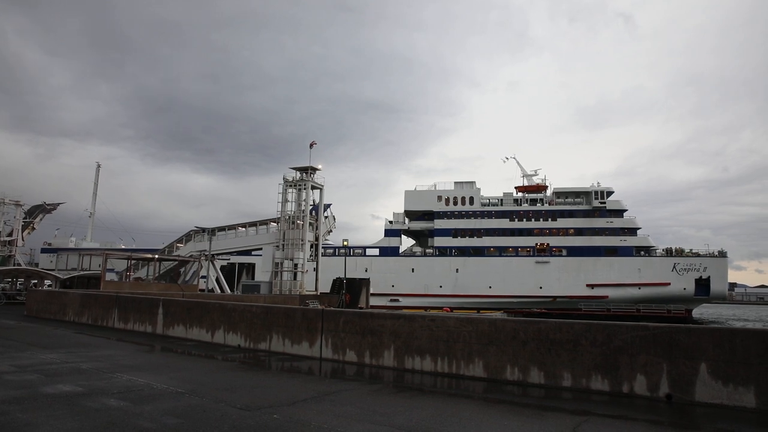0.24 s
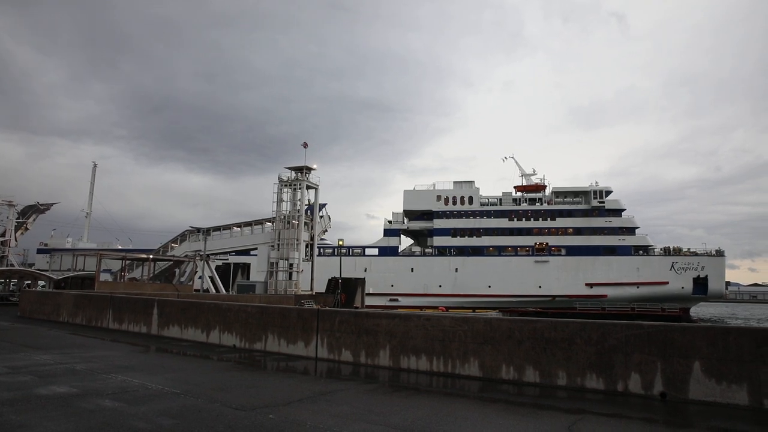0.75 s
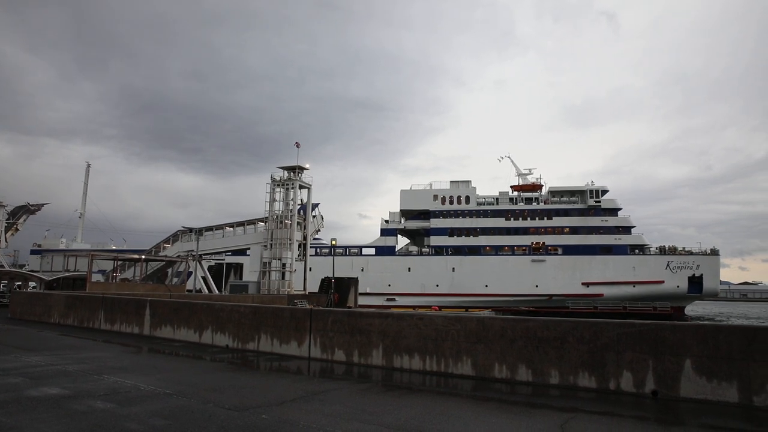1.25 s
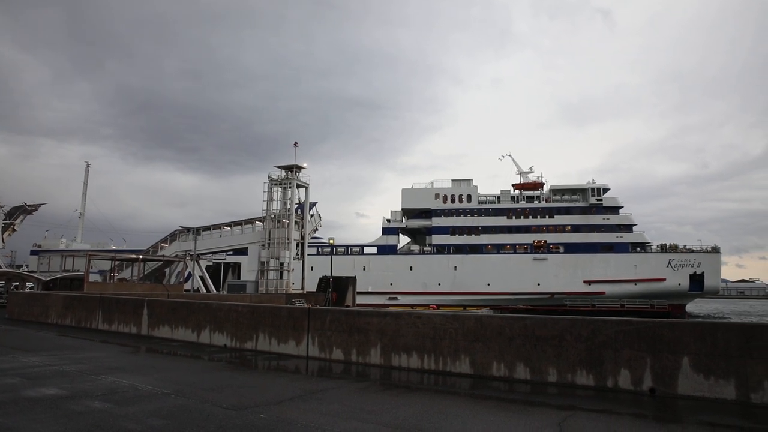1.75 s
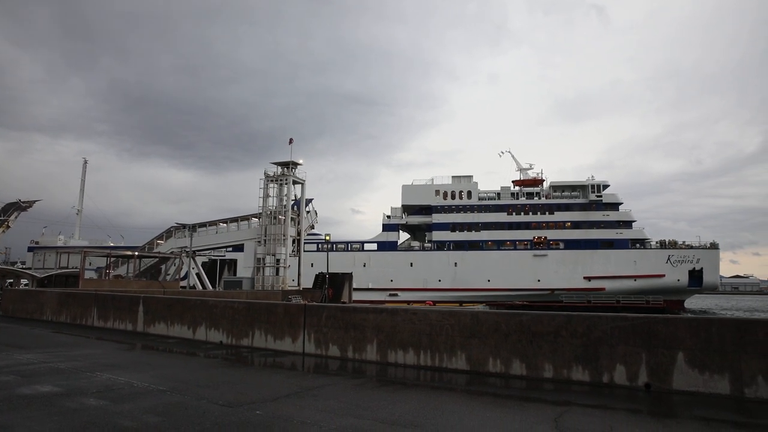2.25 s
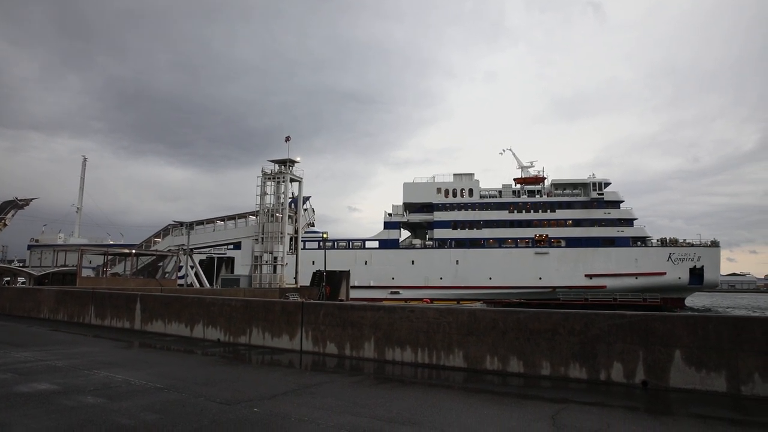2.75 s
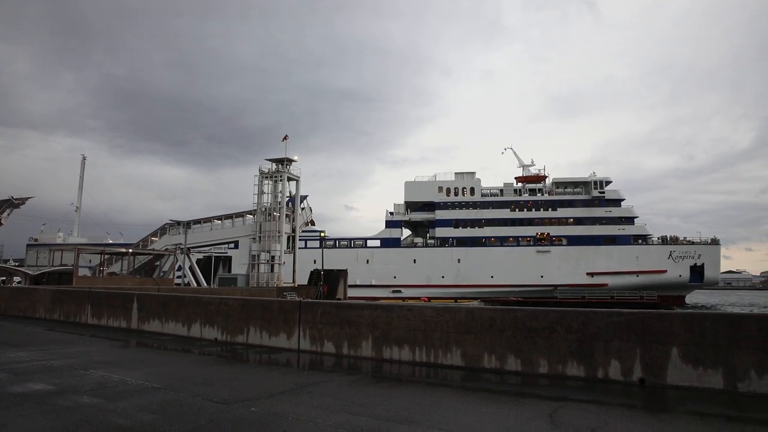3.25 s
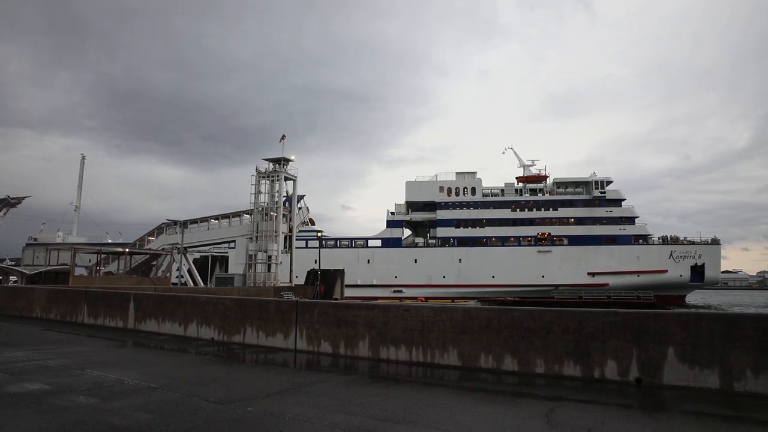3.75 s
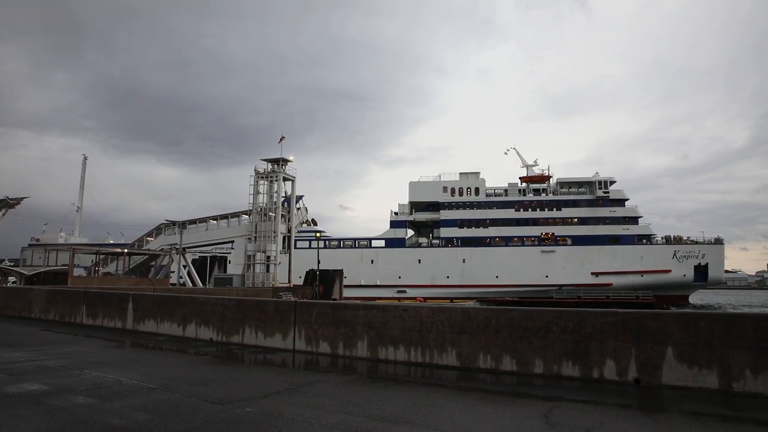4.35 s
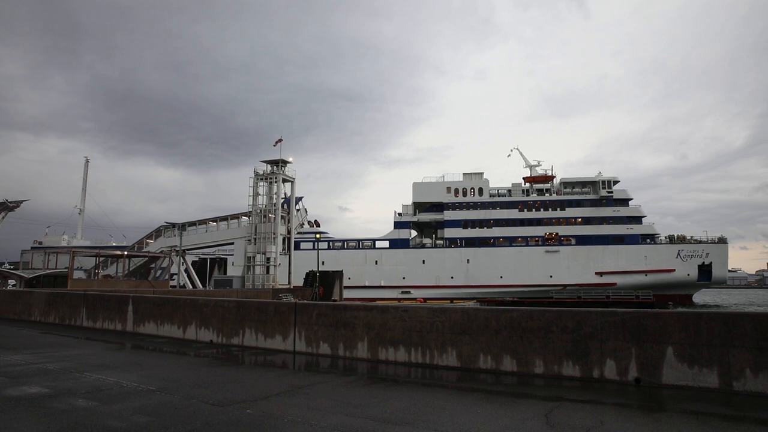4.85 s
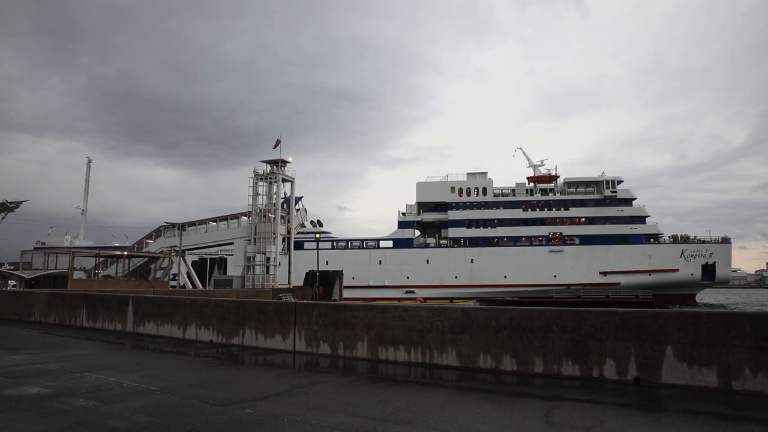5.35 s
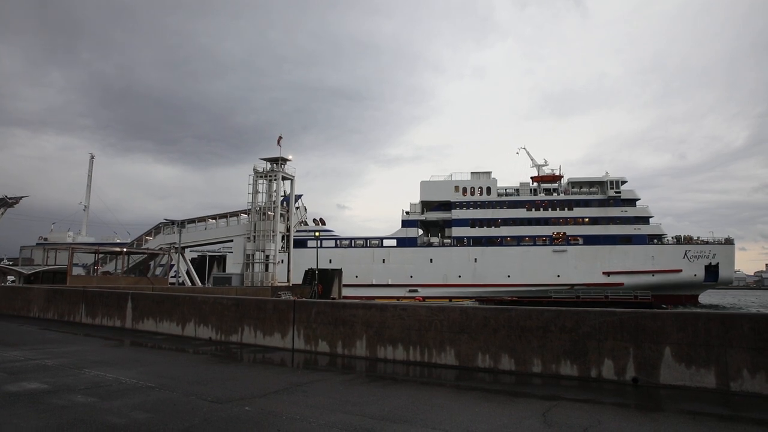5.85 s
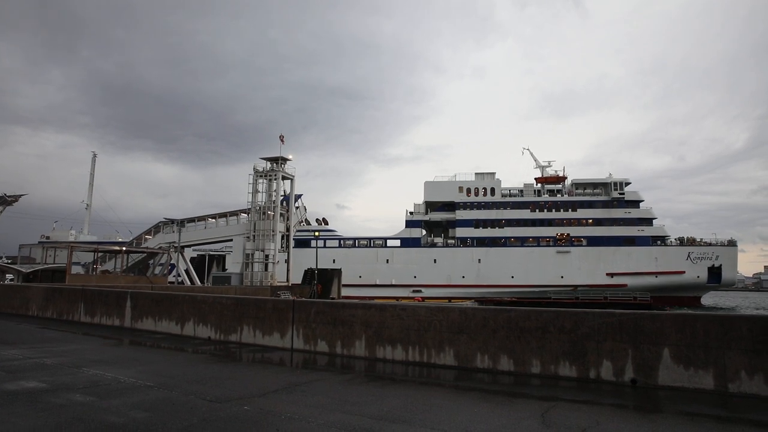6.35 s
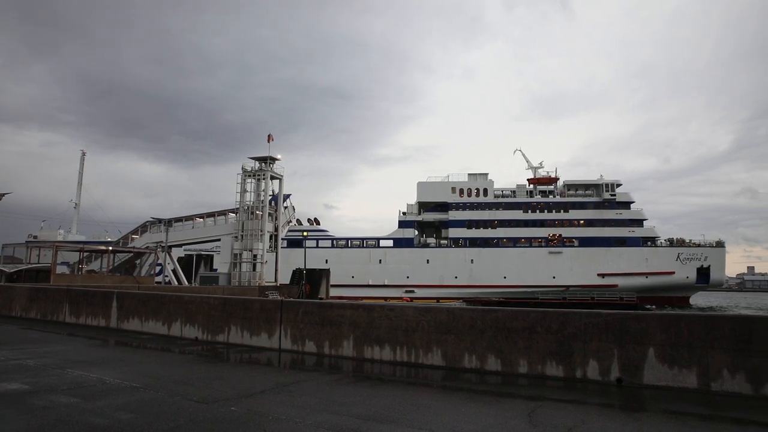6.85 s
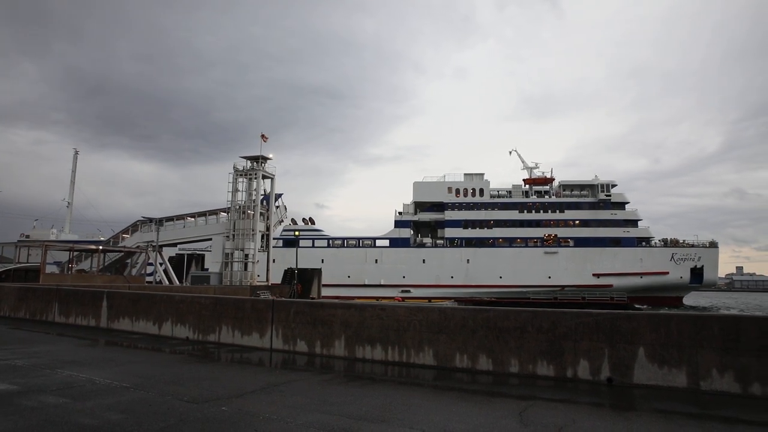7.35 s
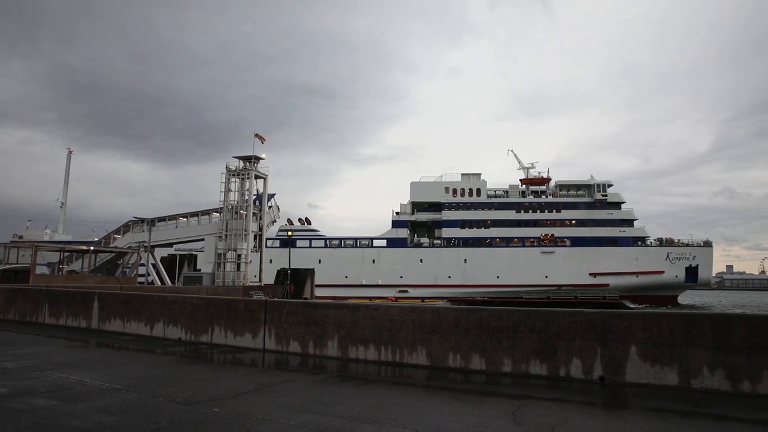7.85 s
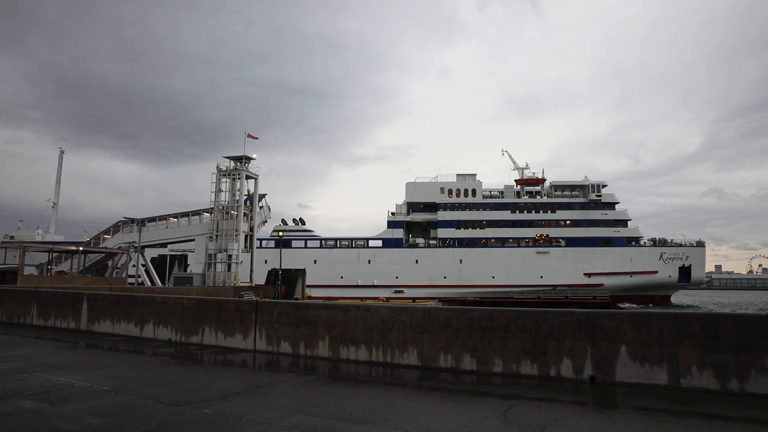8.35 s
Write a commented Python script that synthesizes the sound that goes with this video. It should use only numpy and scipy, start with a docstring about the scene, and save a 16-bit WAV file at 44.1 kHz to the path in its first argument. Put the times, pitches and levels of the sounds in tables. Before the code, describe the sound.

Outdoors by a harbour basin, a ship's whistle gives one continuous low blast with gently shifting overtones and a grainy edge of leaking air. Wind buffets the microphone underneath. After about five and a half seconds the note droops and cuts off; a soft far echo lingers, then roaring wind, a sharp thump, pops and faint ticks fill the rest.

```python
"""A ship's air horn holds one deep note across a harbour basin, then sags in pitch and stops; far shores hum it back.
The note is a stack of partials (a base pitch and its multiples), each swelling and fading on its own.
Wind made of filtered noise roars and hisses; short pressure dips make pops and ticks.
An automatic gain control makes the wind swell after the blast."""
import sys
import numpy as np
from scipy import signal
from scipy.fft import rfft, irfft, next_fast_len
from scipy.io import wavfile
from scipy.ndimage import uniform_filter1d, map_coordinates

SR = 44100
rng = np.random.default_rng(int(sys.argv[2]) if len(sys.argv) > 2 else 0)


def digitize_waveform(pressure):
    """Quantize a signal to 16-bit integers and store it at the path in sys.argv[1].

    Rows of a 2-D input are taken as channels; values are limited to [-1, 1].
    """
    field = np.atleast_2d(pressure).T
    bounded = np.clip(field, -1, 1)
    quanta = np.round(bounded * 32767).astype(np.int16)
    wavfile.write(sys.argv[1], SR, quanta)


N = 379260
PITCH_HZ = 132.87
SHUT_S = 5.505  # the horn's air is shut off
DULL_DB_PER_S = 0.62  # the leaking air and the higher partials weaken as the blast goes on


def amp(db):
    """Turn a level in dB into a gain."""
    return 10 ** (np.asarray(db) / 20)


def unit(x):
    """Scale x to an rms (average strength) of 1."""
    return x / np.sqrt(np.mean(x ** 2))


def since(s):
    """Seconds since moment s, negative before it."""
    return np.arange(N) / SR - s


def bump(s, rise, fall):
    """A smooth swell of height 1 at moment s."""
    t = since(s)
    return np.exp(-(t / np.where(t < 0, rise, fall)) ** 2)


def along(points, hz):
    """Read a curve of (frequency, value) points on a log frequency axis."""
    f, v = np.transpose(points)
    return np.interp(np.log(hz + 1), np.log(f + 1), v)


def curves(rows):
    """Draw each column after the time as a curve with one value per sample."""
    s, *columns = np.transpose(rows)
    return [np.interp(since(0), s, column) for column in columns]


def wobble(rate):
    """A smooth random curve through `rate` random points a second."""
    knots = rng.standard_normal(1024)
    return map_coordinates(knots, [np.arange(N) * rate / SR], mode="wrap")


def fading(rate, steady, size):
    """Complex gain of a tone arriving by one steady path plus slow and quick shifting ones; mean power 1."""
    grid = np.arange(0, size + 128, 128)
    knots = rng.standard_normal((4, 1024))
    rates = [rate, rate, 3.2 * rate, 3.2 * rate]
    a, b, c, d = [map_coordinates(k, [grid * r / SR], mode="wrap") for k, r in zip(knots, rates)]
    quick = 0.68
    gain = steady + a + 1j * b + quick * (c + 1j * d)
    mean_power = steady ** 2 + 2 + 2 * quick ** 2
    return np.interp(np.arange(size), grid, gain / np.sqrt(mean_power))


def filtered(x, response):
    """Multiply the spectrum of x by a response that depends on frequency."""
    m = next_fast_len(len(x) + 8192)  # room for the filter to ring out
    return irfft(rfft(x, m) * response(np.fft.rfftfreq(m, 1 / SR)), m)[:len(x)]


def rush(spectrum, patchy_db, lumps_db=0):
    """Rushing air: coloured noise of rms 1 with patches of random gain and lumps in time."""
    z = signal.stft(rng.standard_normal(N), nperseg=512)[2]
    field = uniform_filter1d(rng.standard_normal(z.shape), size=6, axis=0)  # smooth over frequency
    field = uniform_filter1d(field, size=10, axis=1)  # smooth over time
    noise = signal.istft(z * amp(patchy_db * unit(field)), nperseg=512)[1][:N]
    return unit(filtered(noise * amp(lumps_db), lambda hz: amp(along(spectrum, hz))))


def bursts(rows, rough):
    """Short pointed pressure dips that swing around their centre pitch, torn by turbulence."""
    out, size = np.zeros(N + SR), 4096
    t = (np.arange(size) - size // 2) / SR
    for s, db, length, centre_hz in rows:
        def band(hz):
            low_cut = hz ** 2 / (hz ** 2 + (0.58 * centre_hz) ** 2)
            return low_cut / (1 + (hz / (2.07 * centre_hz)) ** 6)
        torn = unit(filtered(rng.standard_normal(size), band))
        dip = -np.cos(2 * np.pi * centre_hz * t + .6 * rng.standard_normal())
        envelope = np.exp(.7 - np.hypot(t / length, .7))
        out[round(s * SR) - size // 2:][:size] += amp(db) * envelope * (rough * torn + dip)
    return out[:N]


# Gusts on the microphone: (time [s], level over the steady buffeting [dB], rise [s], fall [s])
GUSTS = [(0, 4.5, 0.085, 1.5), (2.9, 6.5, 0.077, .3), (4.4, 7.5, .15, 0.1), (6.2, 5, 0.24, .3),
         (6.88, 7.5, 0.044, 0.44), (7.55, 1.5, 0.14, 0.18), (7.85, 2.5, 0.22, 0.74)]


def buffeting_db():
    """Level of the buffeting: a steady -44.5 dB lifted by each gust."""
    return -44.5 + sum(db * bump(s, rise, fall) for s, db, rise, fall in GUSTS)


# Tone colour of the buffeting: (frequency [Hz], relative level [dB per Hz])
BUFFET_COLOUR = [(15, -31.5), (30, -15), (50, -8), (90, -1), (180, -2), (300, -4), (420, -9), (500, -16.5),
                 (700, -33.5), (3000, -120)]


def buffeting(gust):
    """Wind thumps the microphone as low, lumpy noise."""
    lumps_db = 0.45 * gust + 0.6 * wobble(80)
    return amp(buffeting_db()) * rush(BUFFET_COLOUR, patchy_db=1.7, lumps_db=lumps_db)


# Tone colour of the roar: (frequency [Hz], relative level [dB per Hz])
ROAR_COLOUR = [(200, -61.5), (480, -17), (580, -6), (700, 0), (820, 0.5), (950, -1.5), (1300, -6.5),
               (2000, -16), (3100, -27), (4300, -38), (5200, -49), (7000, -65), (12000, -120)]


def roar(gust, level_db):
    """Wind roars as mid-range noise, made grainy by quick wobbles in level."""
    lumps_db = 0.49 * gust + 0.6 * wobble(28) + 1.5 * wobble(150)
    return amp(level_db) * rush(ROAR_COLOUR, patchy_db=0.77, lumps_db=lumps_db)


# Tone colour of the crackle: (frequency [Hz], relative level [dB per Hz])
CRACKLE_COLOUR = [(600, -42), (1300, -2.5), (2000, 1), (3200, -8), (4500, -19.5), (8000, -40.5),
                  (16000, -49.5)]


def crackle(roar_db):
    """A coarse crackle follows the roar, 25.5 dB below it, and grows by 9 dB once the wind freshens."""
    freshen_s, grow_s = 7.6, .4
    level_db = roar_db - 25.5 + 9 * np.clip(since(freshen_s) / grow_s, 0, 1)
    lumps_db = 2.7 * wobble(16) + 4.4 * wobble(90)
    return amp(level_db) * rush(CRACKLE_COLOUR, patchy_db=3.0, lumps_db=lumps_db)


# Tone colour of the hiss: (frequency [Hz], relative level [dB per Hz])
HISS_COLOUR = [(2000, -60), (4000, -9.5), (5400, -5.5), (7100, 2), (8500, -7), (10000, -8), (12000, -17.5),
               (14000, -22), (16000, -28)]


def hiss(gust, level_db):
    """Wind hisses as high noise that shares the gusts."""
    lumps_db = 0.73 * gust + 1.5 * wobble(30)
    return amp(level_db) * rush(HISS_COLOUR, patchy_db=1.0, lumps_db=lumps_db)


# Tone colour of the sizzle: (frequency [Hz], relative level [dB per Hz])
SIZZLE_COLOUR = [(3000, -60), (5500, -14), (7300, 0.5), (8500, -5), (10500, -4.5), (13000, -10),
                 (16000, -21.5)]


def sizzle():
    """A faint, bright noise that gets louder for one spell and sinks during it."""
    from_s, to_s = 7.27, 7.82
    start_db, sinks_db_per_s, rest_db = -74.5, 9.5, -88.5
    spell = np.clip(np.minimum(since(from_s) / .01, -since(to_s) / .06), 0, 1)
    gain = amp(rest_db) + spell * amp(start_db - sinks_db_per_s * since(from_s))
    return gain * rush(SIZZLE_COLOUR, patchy_db=-1.5, lumps_db=1.1 * wobble(50))


# Strength of the wind: (time [s], roar level [dB], hiss level [dB])
WIND_LEVELS = [(0, -38.5, -73), (.4, -35, -70.5), (.8, -40, -70), (2, -39.5, -64.5), (2.6, -43, -74.5),
               (3.8, -43.5, -74.5), (5.5, -40, -73.5), (6.1, -39.5, -78), (6.5, -40.5, -76),
               (7, -40.5, -77.5), (7.4, -38.5, -71.5), (7.9, -37.5, -76.5), (8.6, -35, -73)]


def wind():
    """Noise layers from low to high; buffeting, roar and hiss share one random gust curve."""
    roar_db, hiss_db = curves(WIND_LEVELS)
    gust = wobble(9)
    return buffeting(gust) + roar(gust, roar_db) + crackle(roar_db) + hiss(gust, hiss_db) + sizzle()


def small_pops(count=50):
    """Small pops at random times, each at a random pitch, that follow the buffeting level."""
    loudest_db, length_s, centre_hz = 6, .006, 190  # loudest is over the buffeting
    first_s = .06
    rows = []
    for when, softness, pitch in rng.random((count, 3)):
        s = first_s + when * (N / SR - first_s)
        rows.append((s, loudest_db - 8 * softness, length_s, centre_hz * 2 ** (pitch - .5)))
    return amp(buffeting_db()) * bursts(rows, rough=.5)


# Single pops of wind on the microphone: (time [s], level [dB], length [s], centre pitch [Hz])
POPS = [(1.97, -23, .003, 300), (2.1, -29, 0.0042, 182), (2.867, -34, .005, 230), (2.93, -31, 0.0046, 218),
        (2.978, -27, .005, 220), (3.2, -31, 0.0037, 295), (4.185, -28, .007, 199), (4.37, -20, .005, 260),
        (4.412, -19.5, 0.0028, 300), (4.478, -22, 0.0056, 258), (6.193, -7.5, 0.0012, 330),
        (6.208, -15, 0.0092, 298), (6.246, -24, 0.0029, 250), (6.4, -28, 0.0026, 280),
        (6.867, -25, 0.0015, 298), (6.958, -23, 0.001, 305), (7.503, -27, 0.0037, 263),
        (7.848, -33, 0.0027, 190), (8.279, -34, 0.0025, 750), (8.52, -33, .003, 760)]


def pops():
    """Wind strikes the microphone as separate, rough pressure dips."""
    return bursts(POPS, rough=0.66)


# Faint high ticks: (time [s], level [dB], centre pitch [Hz])
TICKS = [(.205, -51.5, 12100), (.335, -55.5, 13000), (.347, -49, 12300), (6.191, -56.5, 7300),
         (6.389, -62, 9500), (6.687, -57.5, 6800), (6.775, -53, 6000), (6.838, -54.5, 8700),
         (6.902, -59, 6500), (6.954, -53, 7000), (7.177, -60, 8900)]


def ticks():
    """Very short, high-pitched pressure dips."""
    return bursts([(s, db, .00015, hz) for s, db, hz in TICKS], rough=0.44)


# Hum from far shores, one row each for partials 1 to 4:
# (level at shut-off [dB], fade [dB per s], steadiness [steady part against shifting part])
SHORE_HUM = [(-37, 12.5, 2.2), (-31.5, 10.5, 2.7), (-41.5, 3.5, 4), (-53, 2.5, 1.9)]


def shores():
    """Countless far echoes blur each low partial into a wavering line, until the farthest shore has answered."""
    rise_s, last_s, end_db_per_s = 0.1, 7.85, 54
    phase = 2j * np.pi * PITCH_HZ * np.arange(N) / SR
    rise = np.clip(since(SHUT_S) / rise_s, 0, 1)
    ending = amp(-end_db_per_s * np.maximum(since(last_s), 0))
    hum = np.zeros(N)
    for k, (db, fade_db, steady) in enumerate(SHORE_HUM, 1):
        line = np.real(fading(rate=7.5, steady=steady, size=N) * np.exp(k * phase))
        hum += amp(db - fade_db * since(SHUT_S)) * line
    return np.sqrt(2) * rise * ending * hum


# Tone colour of the escaping air: (frequency [Hz], relative level [dB per Hz])
VENT_COLOUR = [(200, -37), (600, 0), (1100, 1), (1600, -8), (2300, -17), (4000, -31), (8000, -50),
               (12000, -58), (16000, -86)]


def vent():
    """The last air rushes through the bell without a note."""
    peak_s, rise_s, fall_s = 5.55, .035, .045  # rise and fall: times for 10 dB
    t = since(peak_s)
    level_db = -30 - 10 * (t / np.where(t < 0, rise_s, fall_s)) ** 2
    return amp(level_db) * rush(VENT_COLOUR, patchy_db=5.0, lumps_db=1.5 * wobble(60))


def choke_db():
    """Level of the direct sound: 10 dB down choke_s after the air is shut off, then falling ever faster."""
    direct_db, choke_s = -3.5, 0.09
    return direct_db - 10 * (np.maximum(since(SHUT_S), 0) / choke_s) ** 2


# Tone colour of air leaking through the horn: (frequency [Hz], relative level [dB per Hz])
LEAK_COLOUR = [(500, -40), (900, -4), (1300, -1.5), (2000, -10), (3000, -15), (4500, -27.5), (7000, -31.5),
               (10000, -43.5), (13000, -70)]


def leak():
    """Compressed air leaks past the diaphragm once a cycle and roughens the note."""
    gate = 1 + 0.74 * np.cos(2 * np.pi * PITCH_HZ * np.arange(N) / SR)
    level_db = -46 - DULL_DB_PER_S * since(0) + choke_db()
    return amp(level_db) * gate * rush(LEAK_COLOUR, patchy_db=3.0)


# Overtones 3 to 9 dip now and then, or swell where the depth is negative:
# (time [s], partial [number], depth [dB], length [s])
DIPS = [(0.033, 3, 6, 0.097), (.04, 5, 19, 0.17), (0.542, 5, 8, 0.14), (0.616, 6, 17, 0.07),
        (0.705, 7, 9, .05), (1.141, 4, 1.5, 0.069), (1.145, 7, -7.5, .2), (1.174, 3, 23.5, 0.13),
        (1.45, 3, 6, 0.45), (1.507, 7, 17, 0.056), (1.624, 5, 9, 0.17), (1.626, 6, 12, 0.11),
        (1.73, 3, 18.5, 0.14), (1.847, 7, 15.5, 0.14), (2.2, 6, -6.5, .2), (2.347, 4, 6.5, 0.13),
        (2.718, 3, 4.5, 0.22), (2.751, 6, 4.5, 0.6), (2.98, 4, 10, 0.33), (3.301, 3, 4.5, 0.32),
        (3.4, 5, -4.5, 0.45), (3.53, 7, 12, 0.13), (3.576, 3, 6, 0.13), (4.396, 4, 10.5, 0.11),
        (4.453, 3, 6.5, 0.26), (4.62, 7, 7.5, 0.18), (4.801, 6, 3.5, 0.062), (5.15, 6, -5.5, 0.22),
        (5.373, 5, 23, 0.13), (.05, 9, 10.5, .1), (.34, 8, 6, 0.035), (0.844, 9, 17, 0.075),
        (0.896, 8, 6, 0.076), (1.447, 9, 7, 0.15), (1.55, 8, 11, 0.066), (2.02, 8, 9, 0.091),
        (2.377, 9, 10.5, 0.1), (2.6, 8, 14, .1), (2.88, 8, 15, .08), (3.1, 9, 8, 0.18),
        (3.779, 8, 19, 0.082), (4.1, 8, 13.5, 0.096), (4.803, 8, 19, 0.12), (5.151, 9, 14, .2)]


def dips_db(k, n):
    """Total depth of the dips of partial k over n samples."""
    return sum(db * bump(s, length, length)[:n] for s, partial, db, length in DIPS if round(partial) == k)


# The two lowest partials, before the direct and echo gains: (time [s], partial 1 level [dB], partial 2 level [dB])
BLAST = [(0.03, -22, -13), (0.29, -22.5, -15.5), (0.55, -23.5, -13.5), (1.15, -25.5, -14.5),
         (1.79, -27.5, -10.5), (2.02, -27, -13), (2.58, -26.5, -10), (2.89, -28.5, -13.5),
         (2.97, -26.5, -15), (4.35, -22, -12.5), (4.45, -24, -11), (4.94, -21.5, -14.5), (5.28, -25.5, -13),
         (5.49, -25, -12)]
# Strength of the higher partials, before gains and fading: (frequency [Hz], level [dB])
BELL = [(400, -22.5), (530, -31.5), (665, -29.5), (800, -29.5), (930, -33), (1063, -36), (1196, -38),
        (1330, -40.5), (1860, -46), (2400, -54), (3200, -62.5), (4300, -69.5), (5500, -75), (7000, -75.5),
        (9500, -82), (11000, -91), (12500, -106)]


def horn(count=92):
    """Partials of the diaphragm; at shut-off the sagging note beats against the quay echo, which still holds pitch."""
    n = round((SHUT_S + .3) * SR)
    sag_hz, sag_s = 11, 0.0478  # the pitch drops this far, this fast
    quay_db, quay_fade_db_per_s, quay_late_s, quay_end_db_per_s = -10, 50, .165, 600
    still_up_to = 9  # partials up to this number hold fairly still
    low = [amp(db[:n]) for db in curves(BLAST)]
    after = np.maximum(since(SHUT_S)[:n], 0)
    echo_db = quay_db - quay_fade_db_per_s * after
    echo_db -= quay_end_db_per_s * np.maximum(after - quay_late_s, 0)
    echo = amp(echo_db)
    cycles = PITCH_HZ * np.arange(n) / SR
    # the diaphragm's timing flutters at about a third of the pitch: side lines on the upper partials
    flutter = fading(rate=25, steady=0.34, size=n) * np.exp(2j * np.pi * 0.31 * cycles)
    held = np.exp(2j * np.pi * cycles + 1j * 0.0025 * np.real(flutter))
    drop_hz = sag_hz * np.minimum(after / sag_s, 1)
    sag = np.exp(-2j * np.pi * np.cumsum(drop_hz) / SR)
    edge = amp(2 - DULL_DB_PER_S * since(0)[:n])
    direct = amp(choke_db()[:n])
    out, tone = np.zeros(N), np.ones(n)
    for k in range(1, count + 1):
        # one more turn per cycle moves the tone and its sag up to the next partial
        tone, direct = tone * held, direct * sag
        turn = np.sqrt(2) * np.exp(2j * np.pi * rng.random())  # random starting phase
        bell_db = along(BELL, k * PITCH_HZ)
        if k <= len(low):
            gain = low[k - 1]
        elif k <= still_up_to:
            gain = amp(bell_db - dips_db(k, n)) * fading(rate=4, steady=6.3, size=n)
        else:  # turbulence shuffles short waves faster than long ones
            gain = amp(bell_db) * edge * fading(rate=0.605 + .22 * k, steady=0.18, size=n)
        out[:n] += np.real(turn * gain * tone * (direct + echo))
    return out


def scene():
    """Wind, pops, ticks, the far hum and the horn at one microphone."""
    background = wind() + small_pops() + pops() + ticks()
    return (background + shores() + vent() + leak() + horn())[None]


def record(dry):
    """Gain control lifts the sound as the remembered loudness sinks; nothing is kept above the band limit."""
    lift_below_db, memory_s, wait_s, top_hz = -17, 0.26, 0.21, 15720
    keep = np.exp(-1 / (memory_s * SR))
    start = [np.mean(dry[0, :SR] ** 2)]
    power = signal.lfilter([1 - keep], [1, -keep], dry[0] ** 2, zi=start)[0]
    loud_db = 10 * np.log10(np.interp(since(wait_s), since(0), power))  # the control reacts late
    lifted = dry[0] * amp(np.maximum(lift_below_db - loud_db, 0))
    return filtered(lifted, lambda hz: hz < top_hz)[None]


dry = scene()
out = record(dry)
digitize_waveform(out)
```